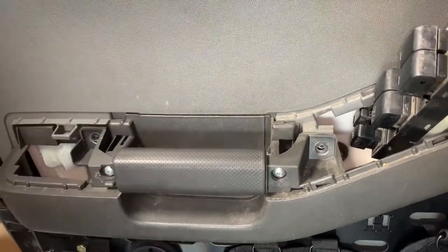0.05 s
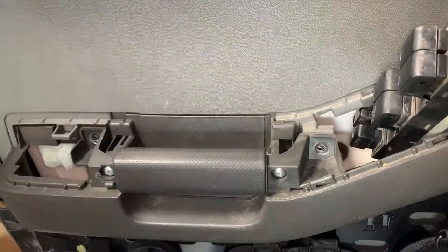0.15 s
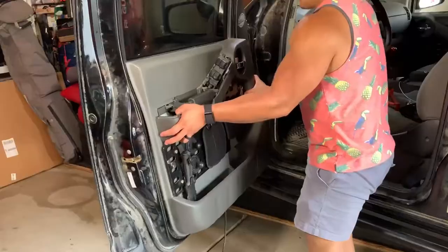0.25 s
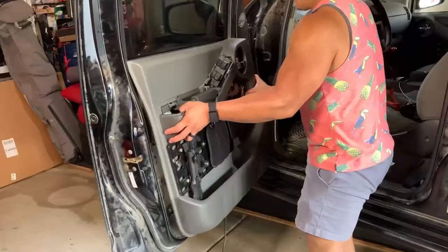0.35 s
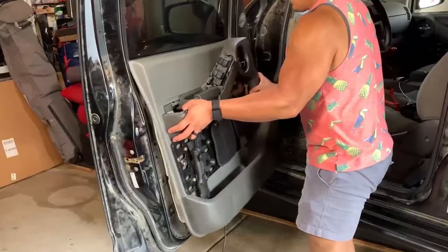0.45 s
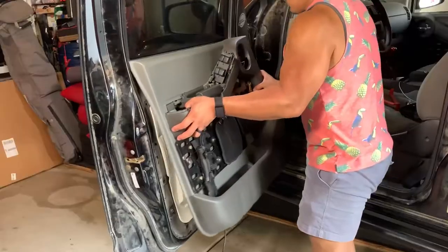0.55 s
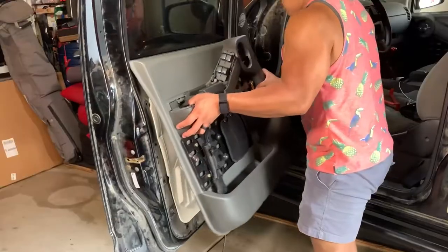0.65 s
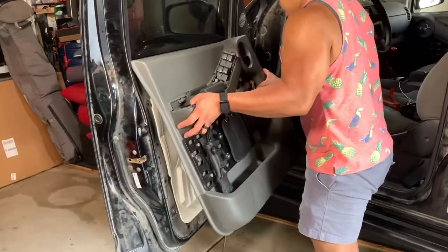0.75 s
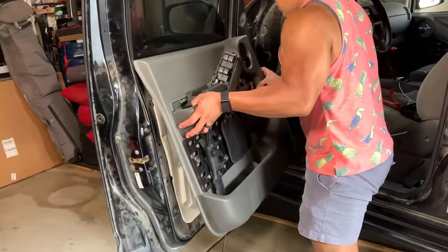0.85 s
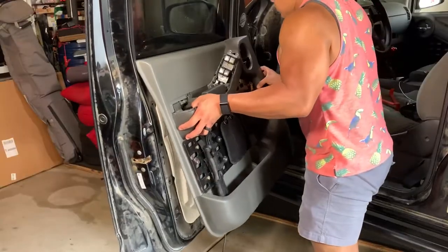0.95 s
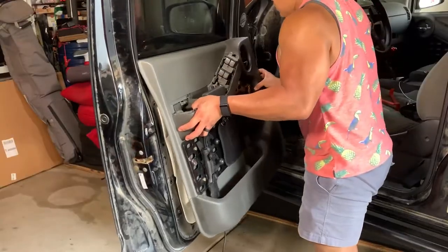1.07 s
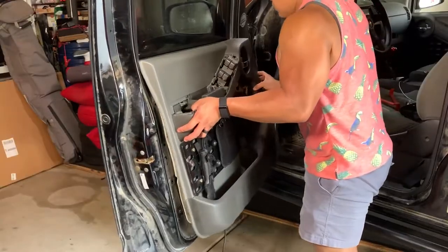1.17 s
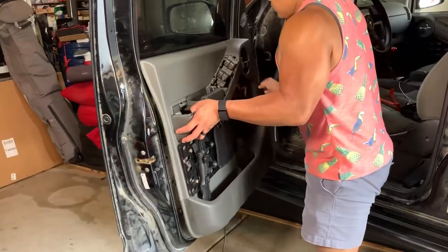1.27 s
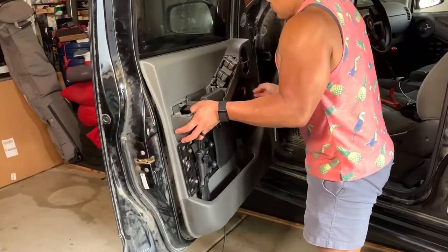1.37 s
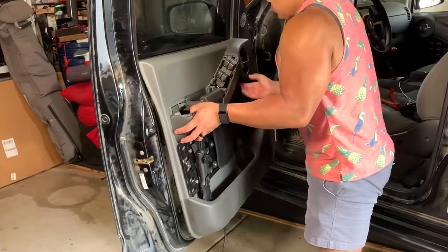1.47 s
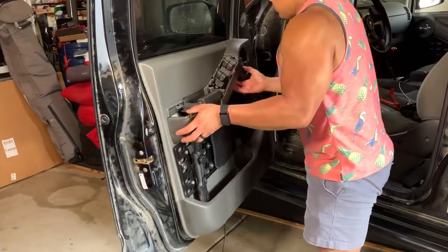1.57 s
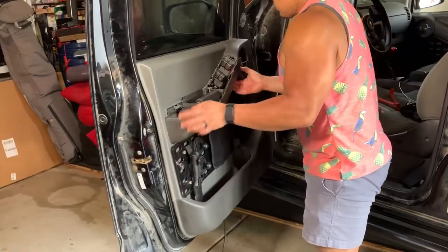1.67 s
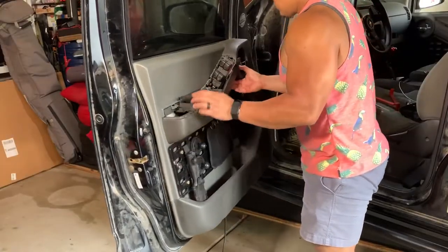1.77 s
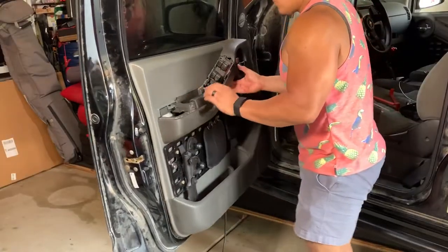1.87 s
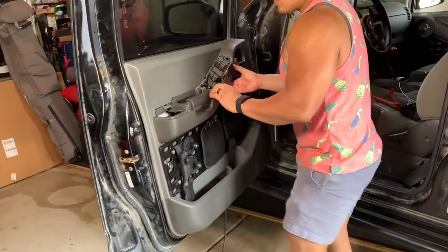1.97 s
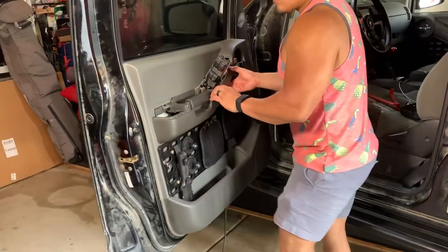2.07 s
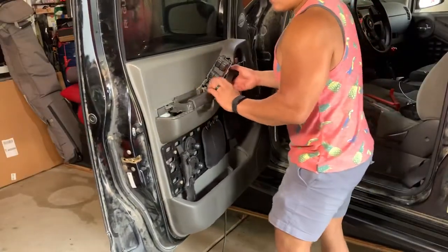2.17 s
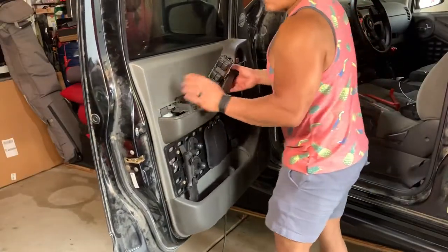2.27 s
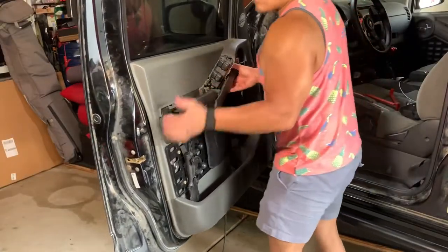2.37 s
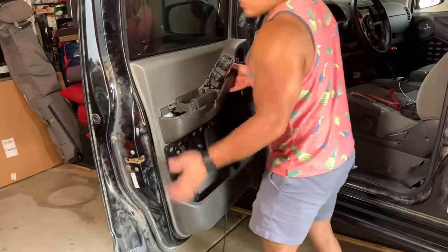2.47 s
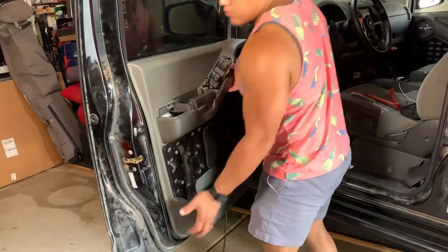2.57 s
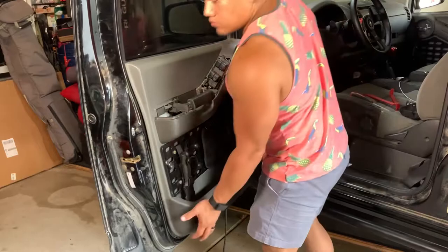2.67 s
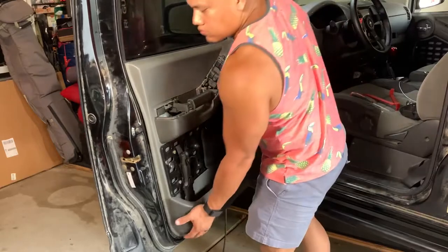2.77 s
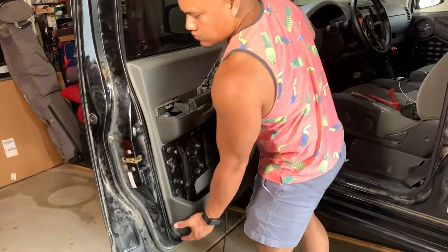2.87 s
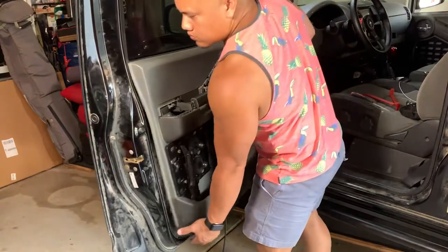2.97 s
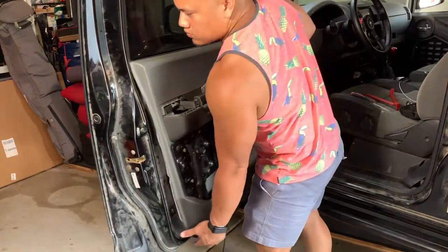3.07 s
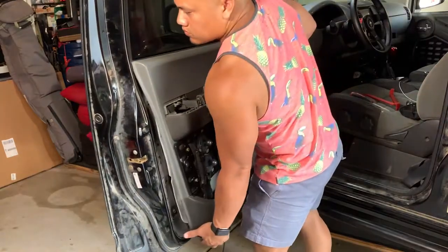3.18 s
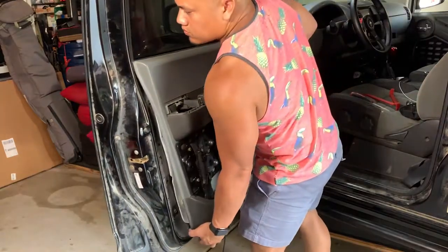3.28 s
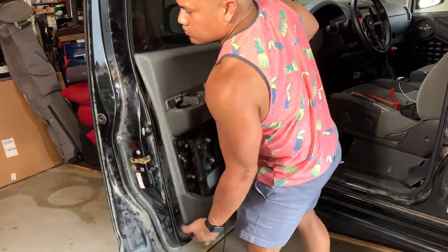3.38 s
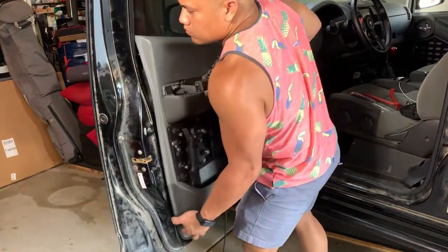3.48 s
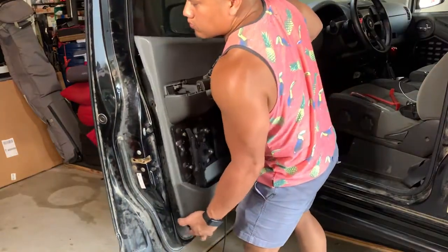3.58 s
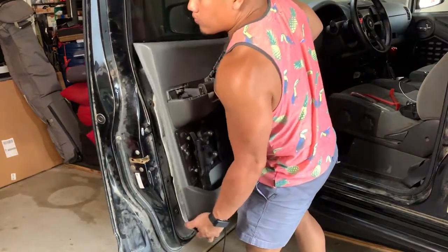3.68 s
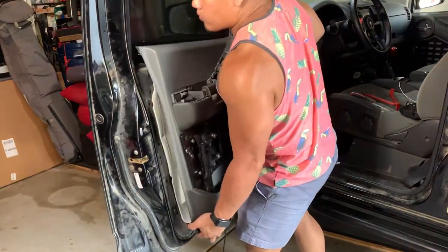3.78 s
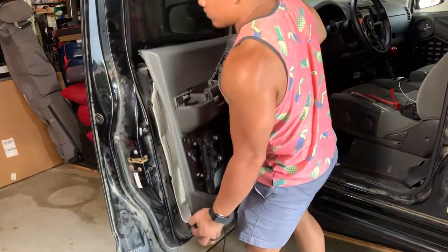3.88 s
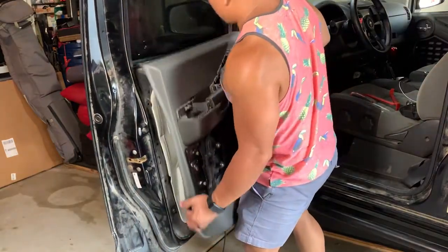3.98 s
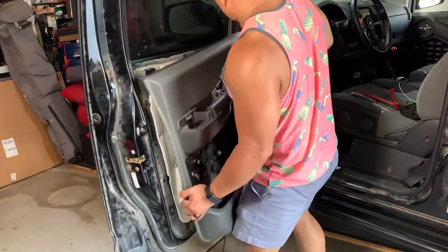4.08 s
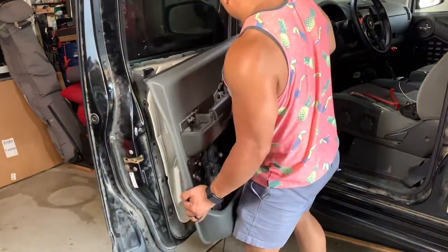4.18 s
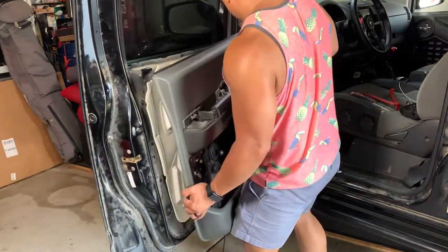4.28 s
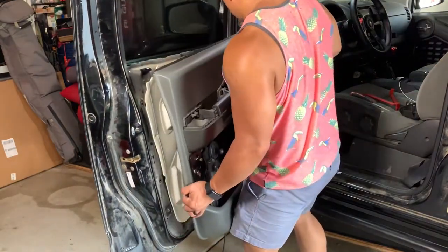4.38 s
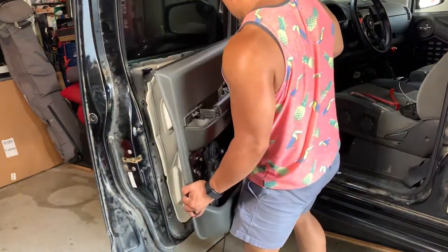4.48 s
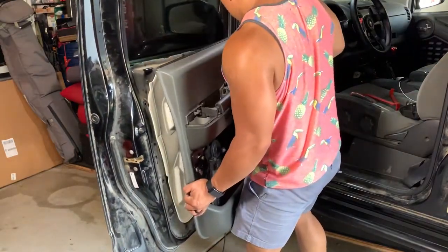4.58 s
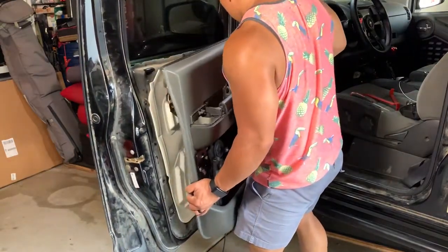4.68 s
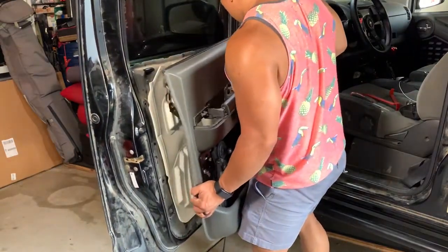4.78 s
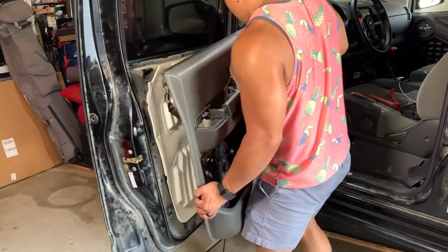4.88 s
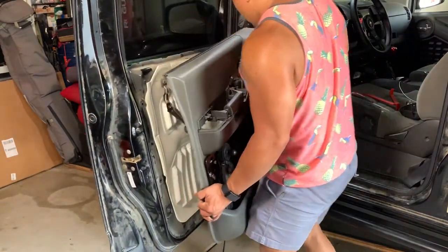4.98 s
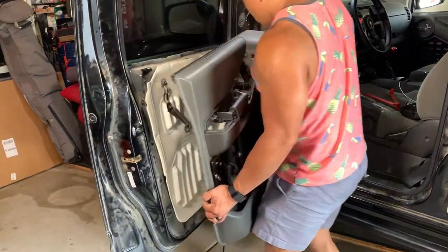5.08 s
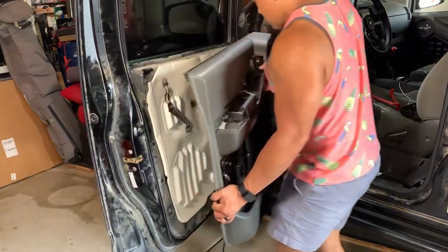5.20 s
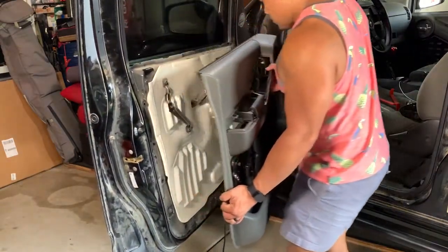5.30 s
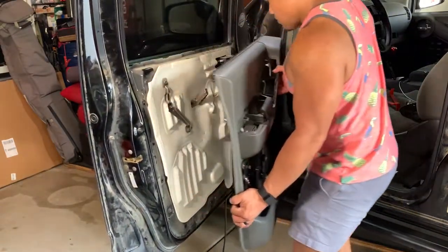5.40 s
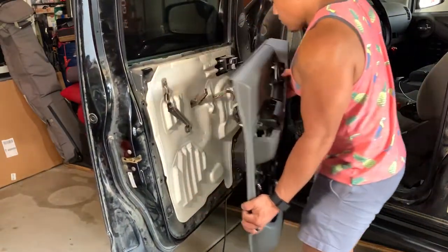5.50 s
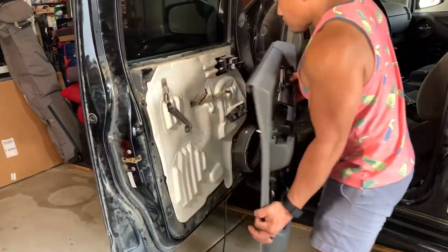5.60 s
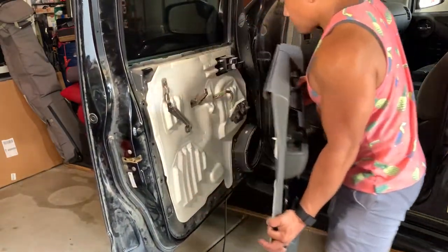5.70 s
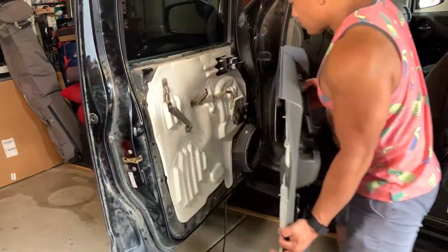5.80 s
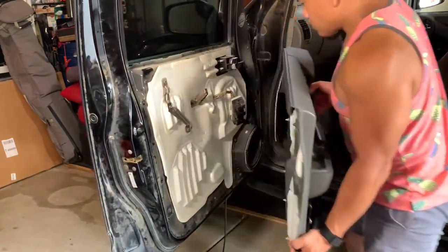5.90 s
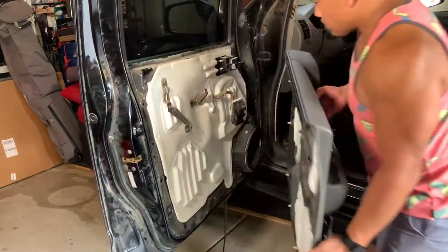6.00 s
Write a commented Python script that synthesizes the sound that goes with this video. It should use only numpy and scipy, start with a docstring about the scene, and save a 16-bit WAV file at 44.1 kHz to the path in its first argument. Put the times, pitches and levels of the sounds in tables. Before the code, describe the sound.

A loose plastic car door panel knocks, scrapes and creaks, then breaks free with loud cracking clacks and a short groan in a garage.

```python
"""In a garage, a plastic trim panel is rocked, lifted and pulled off a car door.
Chattering contacts ring the panel in four ranges: it thumps, knocks, clacks and ticks against the steel.
Clips snap as bright noise ticks; slipping edges creak in damped notes and groan as a sinking stack of partials.
The loose panel shuffles in ringing grains; hands and clothes brush it as patchy noise, over a faint hum and
room noise. Two close microphone ports listen."""
import sys
import numpy as np
from scipy import signal
from scipy.fft import rfft, irfft
from scipy.io import wavfile
from scipy.ndimage import uniform_filter1d

SR = 44100
rng = np.random.default_rng(int(sys.argv[2]) if len(sys.argv) > 2 else 0)


def dump(signal):
    """Clip the signal to [-1, 1] and save it as 16-bit WAV at the path in sys.argv[1]."""
    limited = np.clip(np.atleast_2d(signal).T, -1, 1)
    pcm = np.round(limited * 32767).astype(np.int16)
    wavfile.write(sys.argv[1], SR, pcm)


N = 266760  # samples in the scene


def amp(db):
    """Turns dB into a linear gain."""
    return 10 ** (np.asarray(db) / 20)


def evened(x):
    """Scales x to unit RMS over all its samples."""
    return x / np.sqrt(np.mean(x ** 2) + 1e-20)


def read(points, hz):
    """Reads a (Hz, value) curve along a logarithmic frequency axis."""
    f, value = np.transpose(points)
    return np.interp(np.log(hz + 1), np.log(f + 1), value)


def add(mix, start_s, sound):
    """Lays a sound into the mix, cut off at the end of the scene."""
    part = mix[:, round(start_s * SR):][:, :sound.shape[-1]]
    part += sound[..., :part.shape[1]]


def dying(t, t60):
    """Exponential decay that falls 60 dB in t60 seconds."""
    return np.exp(-np.log(1000) * t / t60)


def first_stream(x):
    """Puts a sound on the first of the two streams that feed the ports."""
    return x * np.array([[1], [0]])


def tinted(x, colour):
    """Filters x with a (Hz, dB) curve and sets unit RMS."""
    return evened(irfft(rfft(x) * amp(read(colour, np.fft.rfftfreq(N, 1 / SR))), N))


def grains(size, spread_db):
    """Two streams of tiny contacts of very uneven strength."""
    return rng.standard_normal((2, size)) * amp(spread_db * rng.standard_normal(size))


def gestures(rows, attack_s, release_t60):
    """Gain of movements (start s, length s, dB): each builds up, holds, and dies away."""
    t = np.arange(N) / SR
    power = np.zeros(N)
    for start, length, db in rows:
        rise = np.clip((t - start) / attack_s, 0, 1)
        release = dying(np.clip(t - start - length, 0, 2), release_t60)
        power += (amp(db) * rise * release) ** 2
    return np.sqrt(power)


def resonances(hz):
    """The modes of panel and door ring on top of a dense, dull response."""
    # Each row: resonance in Hz, width in Hz, lift in dB.
    modes = [(90.7, 6.3, 3), (302, 8.1, -6.5), (361, 9.3, -23.5), (550.7, 4.6, 2), (674, 4.5, -2.5),
             (855, 25, -19), (1521, 22, -4.5), (1594, 22, 0.5), (1748, 32, -1.5), (1770, 15, -12),
             (1990, 22, 1.5), (2244, 120, -5.5), (2344, 48, -0.5), (2556, 110, -2.5), (3052, 12, 3.5),
             (3520, 4.2, -0.5), (4100, 20, -21), (5550, 28, -3.5), (6060, 18, 4), (6580, 25, 5)]
    return 1 + sum(amp(db) / (1 + 2j * (hz - f) / width) for f, width, db in modes)


def garage(x, t60):
    """A diffuse noise tail, drawn separately for each stream, stands for the room."""
    t = np.arange(SR * 3 // 4) / SR
    tail = rng.standard_normal((2, len(t))) * dying(t, t60) * (t > .006)
    return signal.fftconvolve(x, tail / np.linalg.norm(tail[0]), axes=1)[:, :N]


def air(noise_db=-52.5, hum_hz=121.2, hum_db=-60.5):
    """Low room noise with a steady mains hum, a pure sine."""
    # Colour of the room noise. Each row: frequency in Hz, level in dB.
    air_colour = [(18, -33.5), (42, 5.5), (75, -1), (137, -0.5), (326, -16.5), (1230, -22.5), (2400, -28.5),
                  (6700, -45), (16000, -65.5)]
    hum = amp(hum_db) * np.sqrt(2) * np.sin(2 * np.pi * hum_hz * np.arange(N) / SR)
    noise = amp(noise_db) * tinted(rng.standard_normal((2, N)), air_colour)
    return noise + first_stream(hum)


def brush(patchy_db=1.7):
    """Skin and cloth catch on the grain of the plastic with uneven pressure."""
    # Strokes of hands and clothes. Each row: start in seconds, length in seconds, level in dB.
    strokes = [(0.815, 0.058, -48.5), (1.15, 0.06, -67), (1.455, 0.059, -44), (1.59, 0.021, -35),
               (1.99, 0.032, -61.5), (2.146, 0.14, -44), (2.51, 0.48, -72), (2.735, 0.195, -55.5),
               (3.03, 0.44, -72), (3.41, 0.076, -41), (3.8, 0.093, -40.5), (4.24, 0.051, -49),
               (4.85, 0.13, -49), (5.26, 0.11, -56), (5.42, 0.061, -55.5), (5.68, 0.1, -59.5),
               (5.92, 0.15, -65.5)]
    # Colour of the rubbing. Each row: frequency in Hz, level in dB.
    brush_colour = [(200, -26.5), (900, -7.5), (2200, 2), (3500, -1.5), (5500, -3), (8500, -6),
                    (11000, -8.5), (15500, -11.5)]
    pressure = amp(patchy_db * evened(uniform_filter1d(rng.standard_normal(N), size=350)))
    speed = gestures(strokes, attack_s=0.023, release_t60=0.24)
    return tinted(pressure * grains(N, spread_db=2.5), brush_colour) * speed


def shuffle(gain_db=-1, bumps_per_s=34, bump_s=0.0075, drag=.16, handling_db=-64.5):
    """Soft random bumps over a light drag keep the loose panel sounding."""
    # Shoves against the door. Each row: start in seconds, length in seconds, level in dB before gain_db.
    shoves = [(0.21, 0.27, -43), (0.585, 0.041, -42.5), (0.81, 0.12, -40.5), (1.05, 0.21, -48),
              (1.6, 0.074, -27), (1.99, 0.11, -53.5), (2.86, 0.036, -39), (3.41, 0.072, -26.5),
              (3.59, 0.15, -45.5), (4.0, 0.052, -30.5), (4.82, 0.11, -41), (5.1, 0.08, -49.5)]
    # Colour of the dragging. Each row: frequency in Hz, level in dB.
    shuffle_colour = [(20, -26), (55, 1), (130, -0.5), (300, 5.5), (600, -0.5), (1000, 0), (1800, -16),
                      (3500, -24), (16000, -43.5)]
    bumps = (rng.random(N) < bumps_per_s / SR) * rng.uniform(0.27, 1, N)
    age = np.arange(SR // 4) / SR / bump_s  # each bump peaks after bump_s
    force = drag + signal.oaconvolve(bumps, age * np.exp(1 - age))[:N]
    rubbing = force * grains(N, spread_db=5.0)
    ringing = irfft(rfft(rubbing) * resonances(np.fft.rfftfreq(N, 1 / SR)), N)
    # the handling level is a floor: the loose panel never rests entirely
    effort = amp(handling_db) + gestures(shoves, attack_s=0.016, release_t60=0.33)
    return amp(gain_db) * tinted(ringing, shuffle_colour) * effort


def groan(rough=.035, fall_db=9):
    """The top edge sticks and slips along the rubber window seal: an unsteady, sinking stack of partials."""
    start_s, length_s, level_db = 3.9, 0.18, -36.5
    pitch_hz, sag_hz_per_s = 331, 530
    hz = pitch_hz - sag_hz_per_s * np.clip(np.arange(N) / SR - start_s, 0, 2 * length_s)
    waver = evened(uniform_filter1d(rng.standard_normal(N), size=200))
    turns = np.cumsum(hz * (1 + rough * waver)) / SR
    tone = sum(amp(-fall_db * k) * np.sin(2 * np.pi * (k + 1) * turns) for k in range(4))
    effort = gestures([(start_s, length_s, level_db)], attack_s=0.02, release_t60=0.38)
    return first_stream(effort * tone)


def creaks(gain_db=-3, room_db=-6, rise_s=0.00099, rough=0.1):
    """Each slip leaves one damped, slightly unsteady note of the panel."""
    # Each row: start in seconds, level in dB before gain_db, pitch in Hz, 60 dB decay time in seconds.
    slips = [(0.376, -26.5, 250.6, 0.17), (0.624, -20, 553, 0.023), (0.749, -27, 323, 0.062),
             (0.863, -19.5, 940, 0.027), (1.144, -27, 888, 0.06), (1.611, -19, 958, 0.091),
             (2.875, -26, 588.5, 0.17), (2.896, -25, 856, 0.041), (3.362, -28, 1795, 0.042),
             (3.372, -30, 1250, 0.046), (3.431, -12.5, 588, 0.073), (3.488, -17.5, 96, 0.25),
             (3.821, -9, 1731, 0.14), (4.022, -6, 481, 0.041), (4.025, -14, 306, 0.061),
             (4.072, -28, 87.4, 0.51), (4.602, -27, 323, 0.16), (4.744, -22, 1476, 0.11),
             (4.825, -17, 344, 0.09), (5.032, -40, 1445, 0.075), (5.153, -26, 1300, 0.053),
             (5.184, -21, 480, 0.034), (5.587, -33, 267, 0.065)]
    t = np.arange(SR // 2) / SR
    out = np.zeros((2, N))
    for start_s, db, hz, t60 in slips:
        waver = evened(uniform_filter1d(rng.standard_normal(len(t)), size=60))
        note = np.sin(2 * np.pi * np.cumsum(hz * (1 + rough * waver)) / SR)
        envelope = dying(t, t60) * (1 - np.exp(-t / rise_s))
        add(out, start_s, amp(db + gain_db) * note * envelope)
    return first_stream(out) + amp(room_db) * garage(out, t60=0.26)


def clips(gain_db=-2, ring_t60=0.025, room_db=-7):
    """Loose fasteners give small, bright ticks of decaying band noise."""
    # Each row: start in seconds, level in dB before gain_db and the decay.
    snaps = [(1.079, -54), (1.354, -53), (1.473, -21), (1.74, -38.5), (1.872, -43.5), (3.525, -38),
             (4.088, -20.5), (4.598, -22), (4.739, -38), (4.818, -32), (5.18, -39), (5.412, -45),
             (5.489, -58), (5.607, -59.5)]
    t = np.arange(SR // 10) / SR
    out = np.zeros((2, N))
    band = signal.butter(1, [9500, 11800], "bandpass", fs=SR, output="sos")
    for start_s, db in snaps:
        bright = evened(signal.sosfilt(band, rng.standard_normal((2, len(t)))))
        add(out, start_s, amp(db + gain_db) * bright * dying(t, ring_t60))
    return out + amp(room_db) * garage(out, t60=0.29)


def judder(count=5, start_s=3.418, gap_s=0.0165):
    """Pushed up, the panel sticks and slips: a quick, even run of like blows."""
    levels_db = (-24.5, -32.5, -20.5, -43)  # clack, thump, knock, tick, before each range's gain
    return [(start_s + k * gap_s, *levels_db) for k in range(count)]


def contact_point(hz, low_hz, high_hz, count=12, sharpness=30, least_width_hz=28, lift_db=10):
    """Each place that is struck favours its own handful of well damped resonances."""
    draws = rng.random((count, 2))
    # one resonance in each equal musical step of the range
    centres = low_hz * (high_hz / low_hz) ** ((np.arange(count) + draws[:, 0]) / count)
    widths = np.maximum(centres / sharpness, least_width_hz)
    lifts = amp(lift_db) * draws[:, 1] ** 2
    return 1 + sum(lift / (1 + 2j * (hz - f) / w) for f, w, lift in zip(centres, widths, lifts))


def blows(column, low_hz, high_hz, gain_db, rise_s, ring_t60, room_db, room_t60, spread_db):
    """Each blow is a brief chatter of contacts that rings one range of the panel and echoes round the garage."""
    # Each row: start in seconds, then clack, thump, knock and tick levels in dB before gain_db.
    strikes = [(0.211, -35.5, -39, -38.5, -52), (0.254, -20.5, -37, -23.5, -36),
               (0.42, -36.5, -33, -34.5, -52), (0.588, -40, -31, -39, -62), (0.745, -39.5, -45, -35, -58.5),
               (0.805, -39, -41, -33.5, -62), (0.84, -37, -42, -43.5, -40.5), (0.861, -29.5, -34, -30, -37),
               (1.042, -52, -57, -45, -60.5), (1.096, -47.5, -50.5, -41, -64),
               (1.146, -45, -38.5, -36.5, -67), (1.247, -43.5, -40.5, -38, -68.5),
               (1.319, -45, -43, -42, -78), (1.475, -20.5, -32, -20.5, -25),
               (1.609, -21.5, -29.5, -24, -36), (1.655, -38, -32.5, -33.5, -39),
               (1.743, -44, -43, -39.5, -43), (1.787, -34.5, -61, -34.5, -53), (1.872, -42, -49, -62, -47),
               (1.906, -41.5, -59, -41.5, -67), (2.755, -42, -39, -45.5, -71),
               (3.046, -49.5, -59, -46.5, -78), (3.368, -34, -31.5, -35, -53.5),
               (3.525, -37, -26.5, -43.5, -38.5), (3.823, -8.5, -25, -16, -21),
               (3.867, -15, -34.5, -34, -41), (3.993, -14, -35.5, -22, -33.5),
               (4.02, -19, -26, -12.5, -28.5), (4.085, -19.5, -32.5, -23.5, -28),
               (4.205, -32.5, -54, -34, -54), (4.227, -32, -54, -29, -49), (4.257, -27, -32, -26, -31.5),
               (4.596, -30.5, -40.5, -26, -42), (4.738, -15.5, -37.5, -22.5, -23.5),
               (4.818, -26.5, -49, -24.5, -34.5), (4.881, -31.5, -41, -30, -52),
               (5.119, -47, -57, -50, -68), (5.149, -37, -52, -42, -46.5), (5.179, -30.5, -49, -33, -35),
               (5.824, -42.5, -69, -71, -53), (5.925, -39, -52, -45.5, -49.5)]
    # Overall colour of the plastic. Each row: frequency in Hz, level in dB.
    plastic = [(60, 4.5), (300, 4.5), (700, 3.5), (1200, -5), (1800, -6.5), (3000, -14), (5000, -9),
               (7000, -9), (10300, -9), (13000, -26.5), (15500, -14.5)]
    size = 2 ** 15
    early = SR // 50  # 20 ms
    t, hz = np.arange(size) / SR, np.fft.rfftfreq(size, 1 / SR)
    band = signal.butter(3, [low_hz, high_hz], "bandpass", fs=SR, output="sos")
    panel = signal.sosfreqz(band, hz, fs=SR)[1] * resonances(hz) * amp(read(plastic, hz))
    tail = (1 - np.exp(-t / 0.0034)) * dying(t, room_t60)
    out = np.zeros((2, N))
    for row in strikes + judder():
        body = panel * contact_point(hz, low_hz, high_hz)
        # a hard clack breaks contact sooner, which shortens the ring
        length = np.interp(row[1], [-40, -12], [.95, .65])
        envelope = (1 - np.exp(-t / rise_s)) * dying(t, ring_t60 * length)
        contact = grains(size, spread_db) * envelope
        near = irfft(rfft(contact) * body)
        far = irfft(rfft(rng.standard_normal((2, size)) * tail) * body)
        sound = near / near.std(1, keepdims=True) + amp(room_db) * evened(far)
        # a blow's level counts its energy as if it all came in the first 20 ms
        level = amp(row[column] + gain_db) * np.sqrt(early / size)
        add(out, row[0], level * evened(sound[:, :-early]))
    return out


def thump():
    """The whole panel flexes: the lowest range, with a strong room tail."""
    return blows(column=2, low_hz=72.4, high_hz=189, gain_db=-3.0, rise_s=0.0064, ring_t60=0.17,
                 room_db=4.5, room_t60=0.59, spread_db=3.0)


def knock():
    """The panel knocks in its low middle range."""
    return blows(column=3, low_hz=217, high_hz=692.6, gain_db=-4.0, rise_s=0.0063, ring_t60=0.078,
                 room_db=-3.0, room_t60=0.46, spread_db=2.5)


def clack():
    """The panel clacks with a sharp onset in its upper middle range."""
    return blows(column=1, low_hz=847, high_hz=3983, gain_db=-7.0, rise_s=0.00031, ring_t60=0.18,
                 room_db=-3.0, room_t60=0.38, spread_db=2.5)


def tick():
    """The blows tick in the treble, short and very uneven."""
    return blows(column=4, low_hz=4205, high_hz=15400, gain_db=-5.5, rise_s=0.0007, ring_t60=0.036,
                 room_db=-2.0, room_t60=0.27, spread_db=7)


def ports(x):
    """The first stream reaches both ports alike, the second with opposite signs; their spacing turns the phase."""
    # Likeness of the two ports. Each row: frequency in Hz, likeness from 0 to 1.
    likeness = [(100, 0.91), (300, 0.88), (700, 0.27), (1700, 0.18), (3000, 0), (6500, 0.64), (8000, 0.97)]
    # Lead of the left port. Each row: frequency in Hz, phase in radians.
    lead = [(0, 0), (1800, -.3), (3000, 2.6), (4200, -.3), (5400, 3.1), (6300, 0), (8500, -3.14),
            (11000, -6.28), (13500, -9.42), (15500, -12.57)]
    # Each row: frequency in Hz, left minus right in dB.
    balance = [(60, -2), (300, -1), (1000, 0.5), (2500, 0.4), (5000, -3.5), (8000, 0.5)]
    hz = np.fft.rfftfreq(N, 1 / SR)
    same = np.clip(read(likeness, hz), 0, 1)
    shared, apart = rfft(x) * np.sqrt([(1 + same) / 2, (1 - same) / 2])
    # each port takes half of the lead and half of the balance
    turn = np.exp(.5j * np.interp(hz, *np.transpose(lead))) * amp(read(balance, hz) / 2)
    return irfft(np.array([(shared + apart) * turn, (shared - apart) / turn]), N)


def scene():
    """Room, friction, clips and the four ranges of the blows meet at the two ports."""
    friction = brush() + shuffle() + groan() + creaks()
    impacts = clips() + thump() + knock() + clack() + tick()
    return ports(air() + friction + impacts)


def record(dry, start_s=0.21, edge_hz=16000):
    """Silence until the sound opens; the loudest peaks round off; then the band limit."""
    opened = np.interp(np.arange(N) / SR, [start_s - .002, start_s], [0, 1])
    rounded = dry / (1 + (dry / .88) ** 6) ** (1 / 6)
    lowpass = signal.firwin(255, edge_hz, window=("kaiser", 9), fs=SR)
    return signal.oaconvolve(rounded * opened, lowpass[None], "same")


dry = scene()
out = record(dry)
dump(out)
```